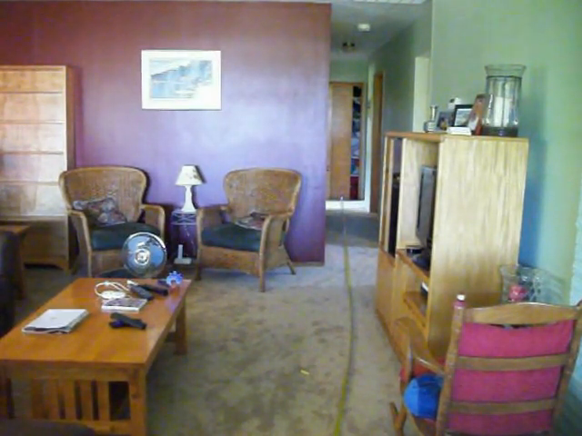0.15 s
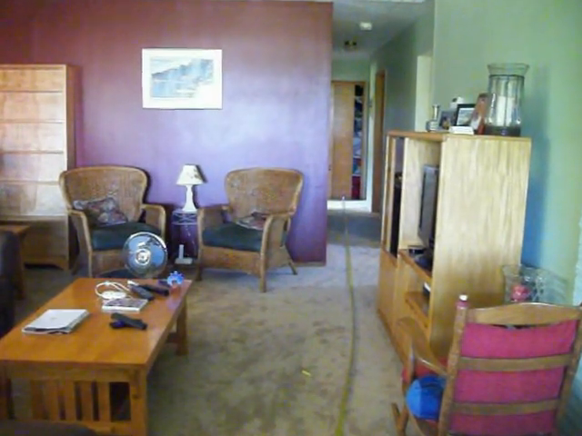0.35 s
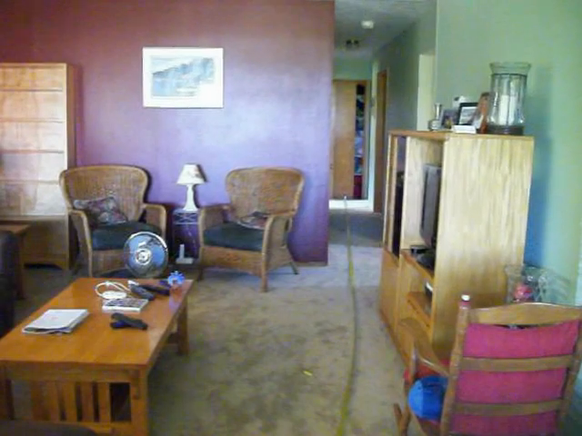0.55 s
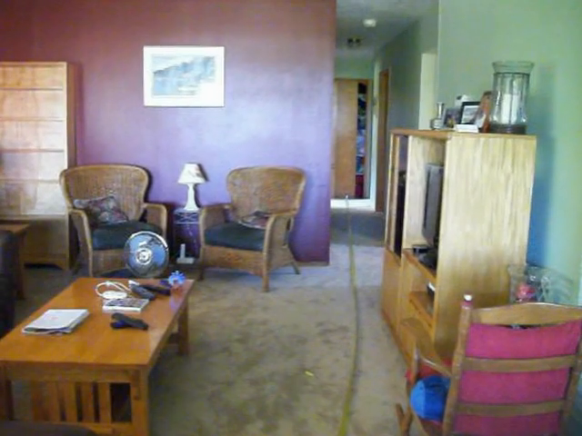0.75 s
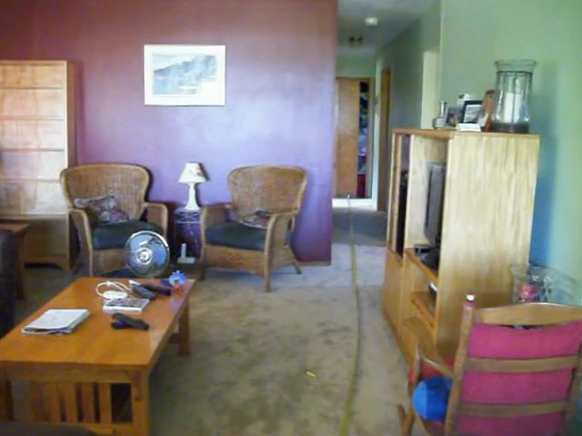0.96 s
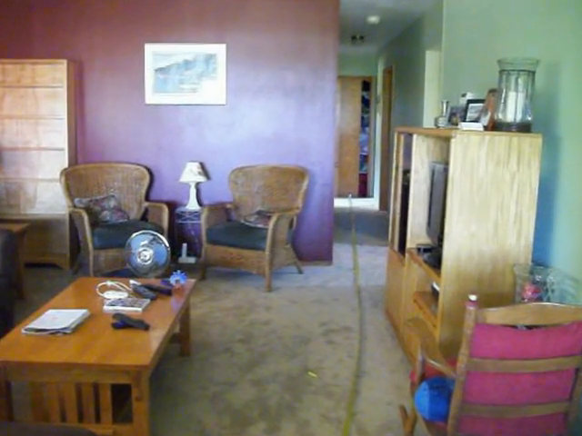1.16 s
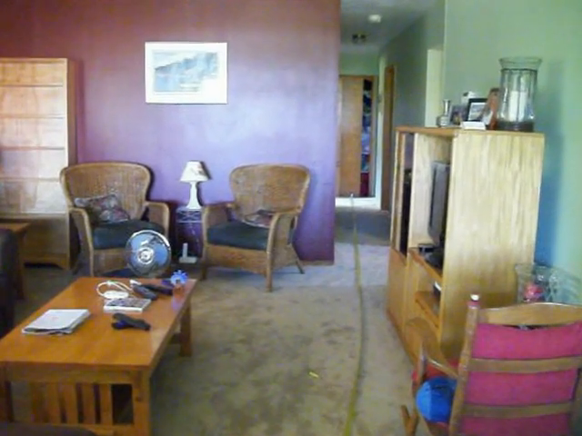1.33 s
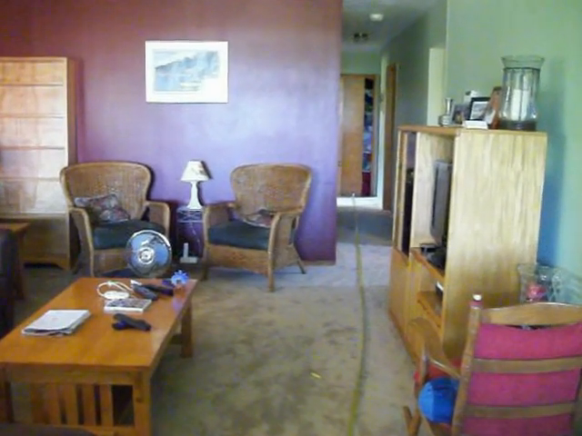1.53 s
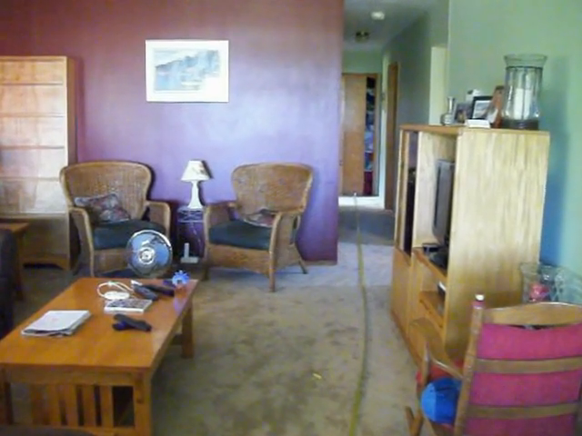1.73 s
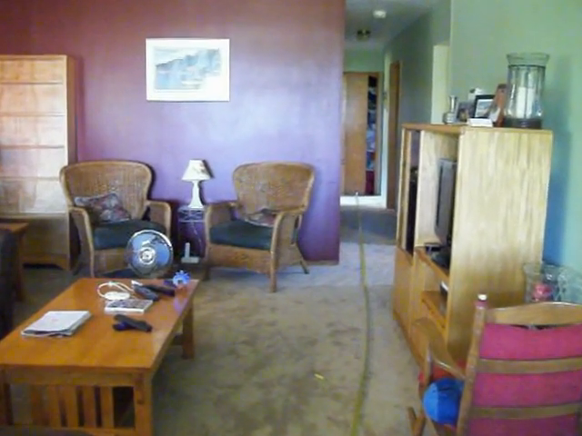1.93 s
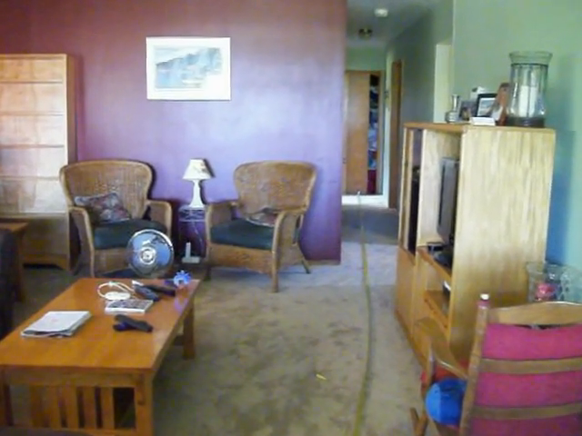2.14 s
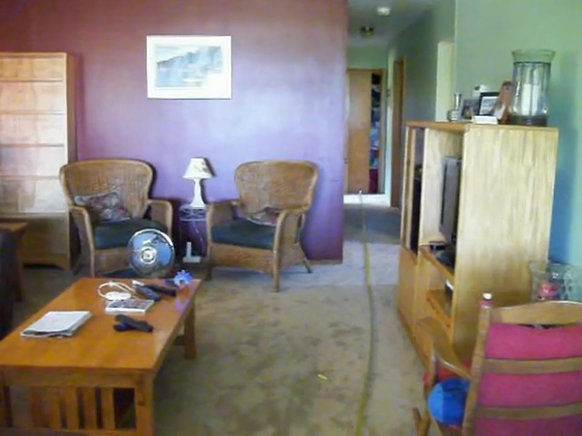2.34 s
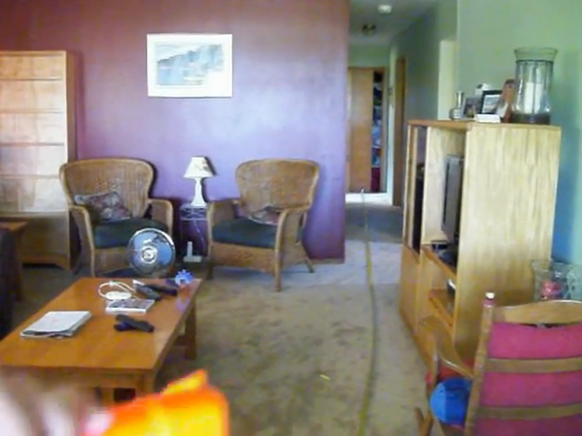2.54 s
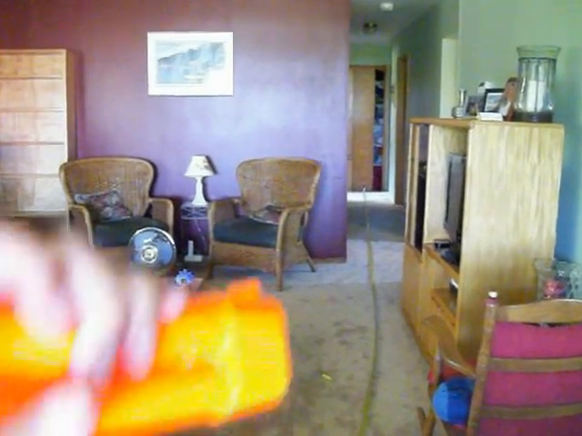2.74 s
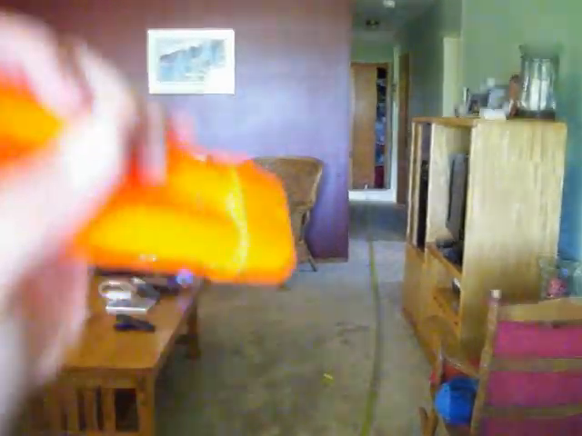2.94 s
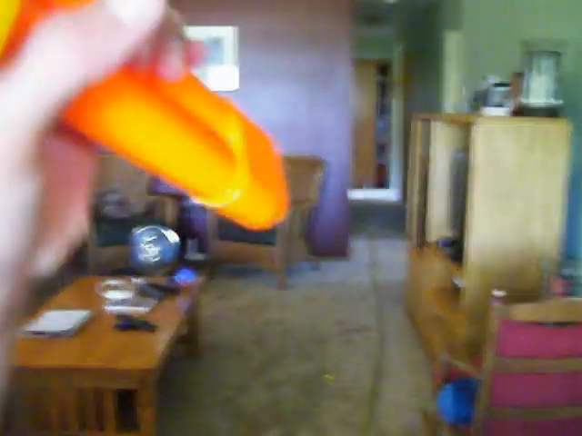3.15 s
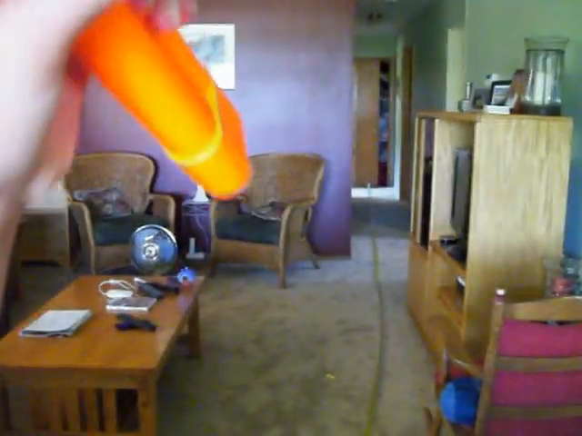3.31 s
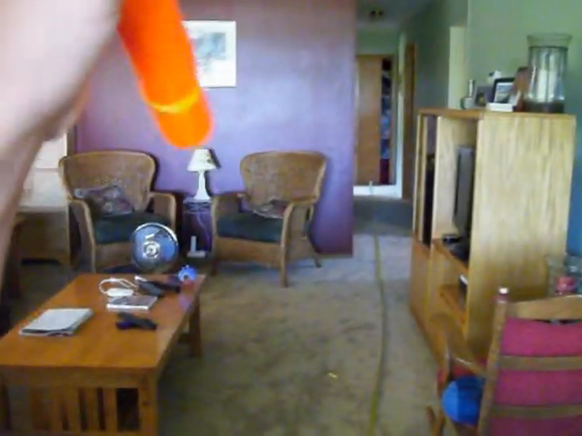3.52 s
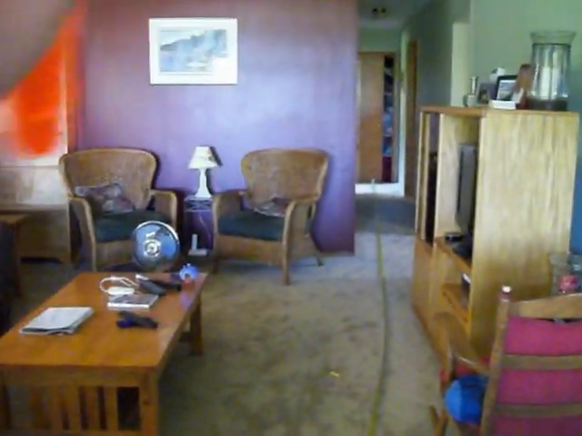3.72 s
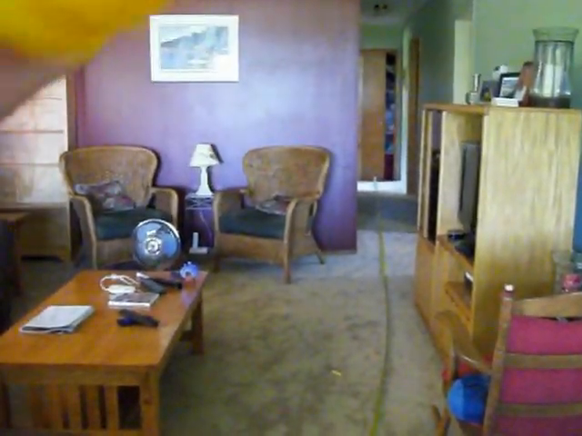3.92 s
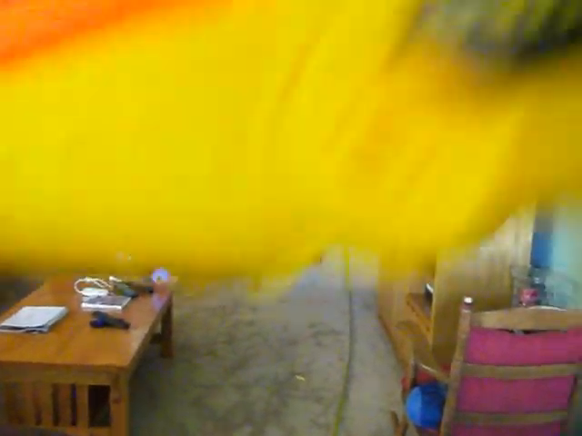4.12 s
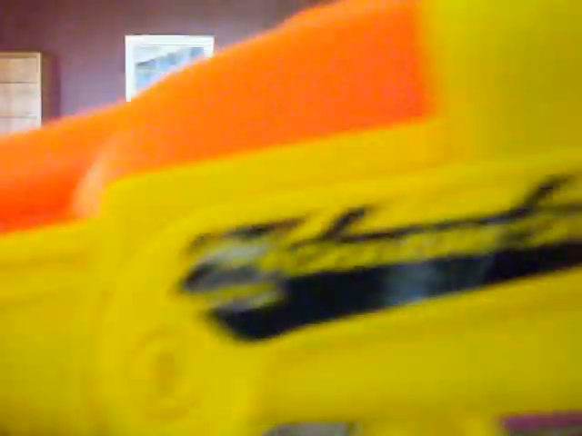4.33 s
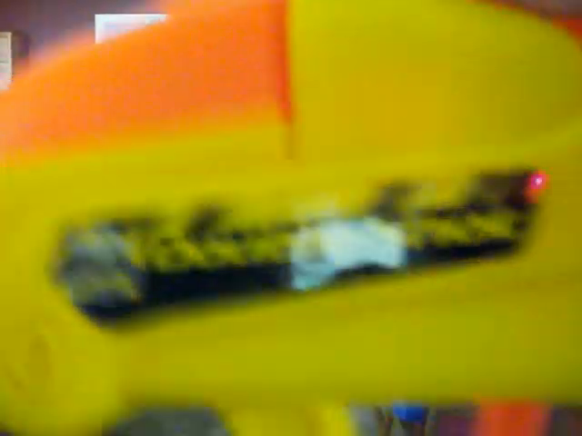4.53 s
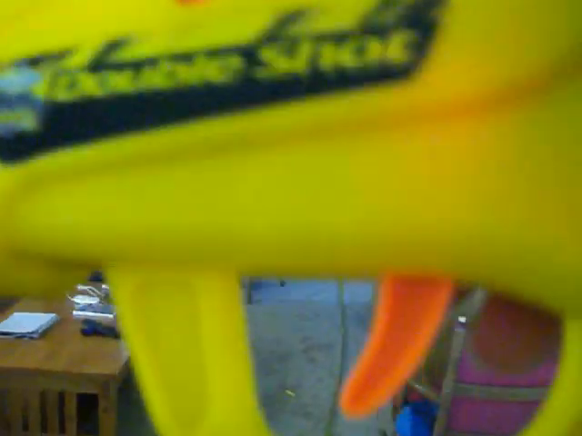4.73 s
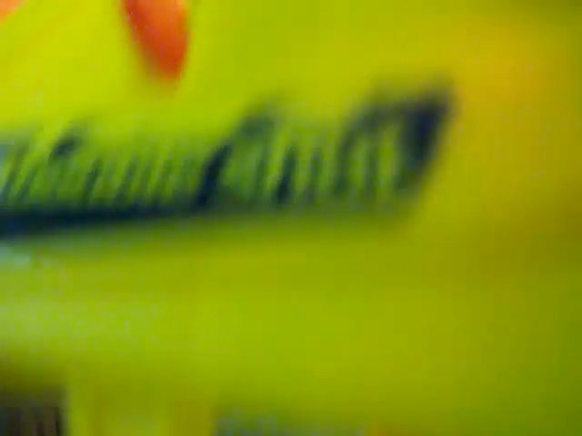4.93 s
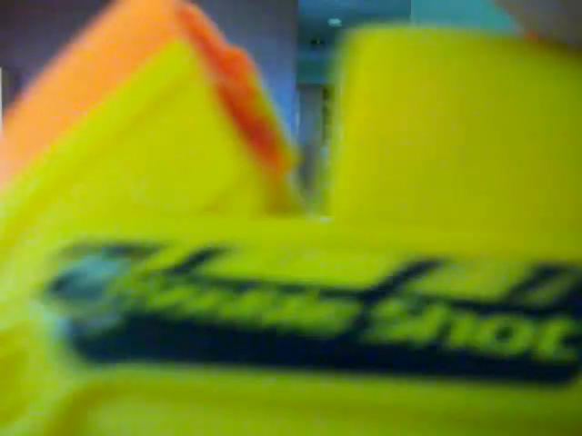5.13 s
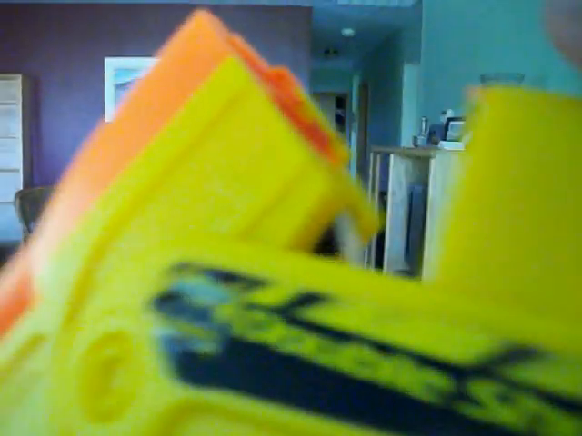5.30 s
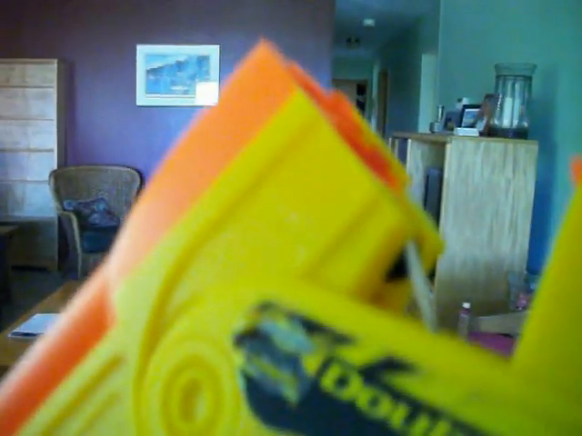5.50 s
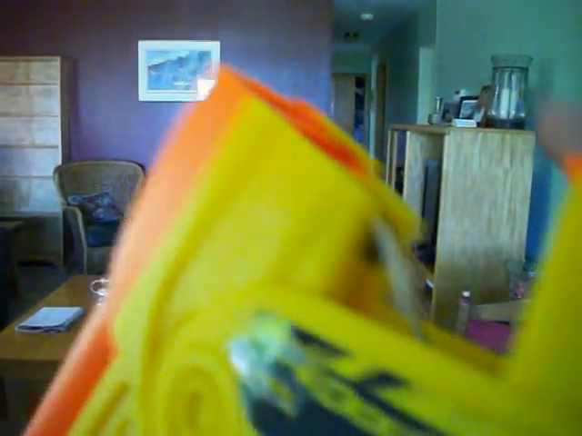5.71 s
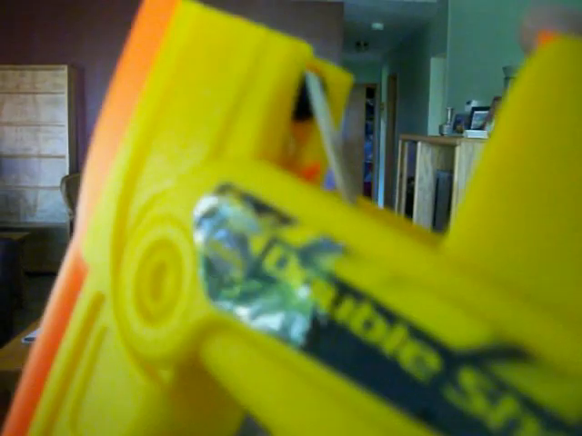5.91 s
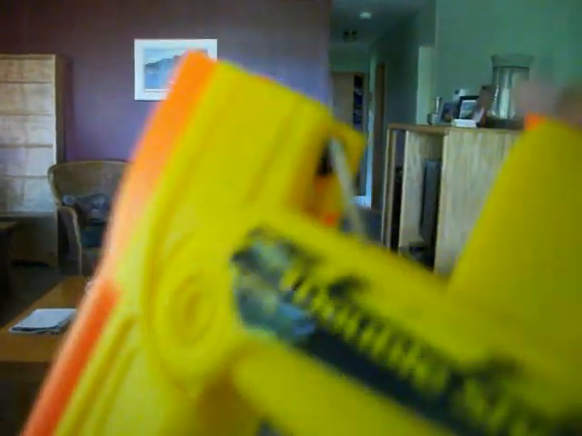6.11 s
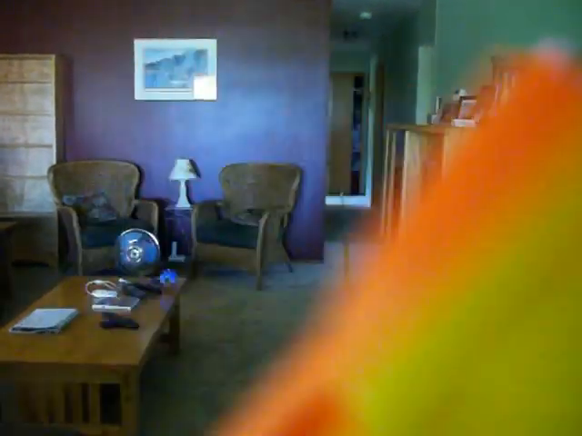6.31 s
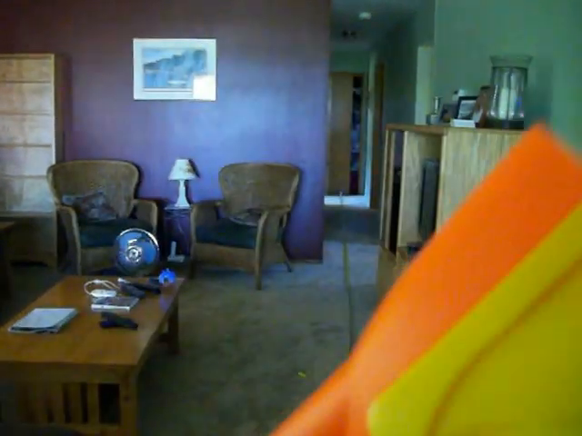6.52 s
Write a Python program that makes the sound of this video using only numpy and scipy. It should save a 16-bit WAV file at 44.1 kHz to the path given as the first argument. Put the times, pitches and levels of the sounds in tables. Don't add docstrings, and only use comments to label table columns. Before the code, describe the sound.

A hollow plastic toy blaster is fumbled, drops a part clattering on a tabletop, then is worked with increasingly loud clacks, grinding and squeaks.

```python
import sys
import numpy as np
from scipy import signal
from scipy.fft import rfft, irfft
from scipy.io import wavfile

SR = 44100
rng = np.random.default_rng(int(sys.argv[2]) if len(sys.argv) > 2 else 0)


def put_to_file(sound):
    columns = np.atleast_2d(sound).T
    safe = np.clip(columns, -1, 1)
    whole_steps = np.round(safe * 32767)
    wavfile.write(sys.argv[1], SR, whole_steps.astype(np.int16))


def undo_db(level):
    steps = np.asarray(level, float) / 20
    return 10 ** steps


N = 289296


def rms_one(x):
    return x / np.sqrt(np.mean(x ** 2) + 1e-20)


def drift(rate_hz):
    r = np.exp(-2 * np.pi * rate_hz / SR)
    noise = rng.standard_normal(N + SR)
    return rms_one(signal.lfilter([1], [1, -2 * r, r * r], noise)[SR:])


def resonate(x, hz, width_hz):
    r = np.exp(-np.pi * width_hz / SR)
    zeros = [(1 - r * r) / 2, 0, (r * r - 1) / 2]
    poles = [1, -2 * r * np.cos(2 * np.pi * hz / SR), r * r]
    return signal.lfilter(zeros, poles, x)


def body(x, modes):
    return sum((-1) ** k * undo_db(db) * resonate(x, hz, w) for k, (hz, w, db) in enumerate(modes))


def coloured(x, spectrum):
    hz, db = np.transpose(spectrum)
    f = np.fft.rfftfreq(N, 1 / SR) + 1
    gain = undo_db(np.interp(np.log(f), np.log(hz), db))
    return rms_one(irfft(rfft(x) * gain, N))


def grains(per_s, spread_db):
    sizes = undo_db(spread_db * np.minimum(rng.exponential(1, N), 4)) * rng.choice([-1, 1], N)
    return sizes * (rng.random(N) < per_s / SR) + 1e-18


def stretches(tables):
    t, rows = np.arange(N) / SR, np.concatenate(tables)
    edges = [(p[0][0] - .002, p[0][0], p[-1][0], p[-1][0] + .003) for p in tables]
    gate = sum(np.interp(t, e, [0, 1, 1, 0]) for e in edges)
    return [gate] + [np.interp(t, rows[:, 0], c) for c in rows.T[1:]]


def add(out, s, sound):
    i = round(s * SR)
    out[i:i + len(sound)] += sound[:N - i]


def contact(ring_hz, ring_db, crack_db, crack_hz, noise, ring_s, chatter_s, broad):
    t = np.arange(len(noise)) / SR
    touch = noise + 2.5 * np.sign(noise[0]) * (t < .00008)
    chatter = touch * np.exp(-t / chatter_s)
    panel = resonate(resonate(chatter, crack_hz, 1200), crack_hz, 1200)
    crack = panel + broad * resonate(resonate(chatter, 4300, 8200), 4300, 8200)
    ring = resonate(resonate(touch * np.exp(-t / ring_s), ring_hz, 880), ring_hz, 880)
    return undo_db(ring_db) * ring / np.abs(ring).max() + undo_db(crack_db) * crack / np.abs(crack).max()


def contacts(rows, ringing, scatter_db):
    out = np.zeros(N)
    shell_hz, ring_gain_db, crack_gain_db, chatter_s, ring_s, broad = ringing
    for s, crack_db, ring_db, crack_hz in rows:
        noise = rng.standard_normal(900)
        ring_hz = shell_hz * undo_db(scatter_db * noise[-1])
        add(out, s, contact(ring_hz, ring_db + ring_gain_db, crack_db + crack_gain_db, crack_hz, noise,
                            ring_s, chatter_s, broad))
    return out


# start in seconds, crack peak in dB, hollow ring in dB, crack in Hz.
FUMBLES = [(0.1595, -39, -44, 2560), (0.4557, -32.5, -37, 2200), (0.484, -24.5, -38, 4430),
           (0.7851, -30.5, -43, 4600), (1.2132, -36, -44, 2100), (1.2414, -35.5, -43, 2660),
           (1.3864, -26, -33, 2350), (1.3924, -13.5, -31, 2680), (1.4507, -23, -34, 1980),
           (1.4843, -15.5, -27.5, 4420), (1.494, -14.5, -27.5, 2620), (1.943, -35, -51, 2600),
           (2.2181, -17, -27.5, 3950), (2.3349, -20, -31.5, 3060), (2.4402, -27, -30.5, 1750),
           (2.6674, -21, -32.5, 3150), (2.697, -30, -39.5, 4440), (2.818, -37, -49, 1940),
           (2.861, -31, -59, 2370), (2.771, -42, -60, 4470), (2.9655, -50, -59, 4030),
           (3.7582, -42, -42, 1930), (3.7733, -27, -31.5, 3240), (3.783, -31, -55, 1810)]
DROP = [(2.9876, -26, -50, 3900), (2.9915, -16, -31, 2950), (2.9964, -12, -24, 1910),
        (2.9997, -11, -23, 2840), (3.0099, -13, -11, 1980), (3.0158, -12, -30, 2320),
        (3.0246, -14, -28.5, 2500), (3.031, -13, -37, 2800), (3.0377, -17.5, -32, 2300),
        (3.0417, -15, -26, 2240), (3.051, -19, -24, 2650), (3.062, -15, -33, 2300),
        (3.099, -6.5, -33, 2180), (3.1051, -17, -26, 2670), (3.1131, -13, -27, 4800),
        (3.126, -18, -41, 2710), (3.131, -14, -29, 5120), (3.1438, -21, -40, 4640),
        (3.1526, -30, -42, 1970), (3.19, -14, -14, 2200), (3.195, -20.5, -27, 5000),
        (3.2072, -20, -27, 1950), (3.2145, -38, -39, 2350), (3.2234, -26, -31, 2200),
        (3.233, -25, -36, 1750), (3.252, -31, -43, 1880), (3.261, -30, -45, 1710), (3.3198, -31, -33, 1990),
        (3.3224, -21, -26, 1900), (3.327, -28, -34.5, 2110)]
PICK_UP = [(3.9988, -25, -26, 3080), (4.006, -11, -27, 3360), (4.0103, -3, -21, 1700),
           (4.022, -9, -28.5, 1700), (4.0271, -11.5, -29, 1720), (4.2345, -36, -63, 4010),
           (4.2927, -26, -31.5, 2940), (4.3005, -32, -52, 1980), (4.336, -14, -21.5, 2800),
           (4.3472, -47, -34, 2780), (4.353, -36, -38, 4370), (4.3648, -42, -36, 4220),
           (4.387, -26, -24, 1700), (4.3945, -18, -25, 3280), (4.4, -23, -41, 2370),
           (4.4047, -21, -33, 2350), (4.4149, -25, -27, 2410), (4.4236, -26, -35, 2690),
           (4.432, -23, -29, 2410), (4.438, -30, -38.5, 2930), (4.445, -25, -45, 2530),
           (4.4566, -30, -45, 2370), (4.5151, -27.5, -21.5, 2610), (4.5387, -21.5, -24, 1700)]
LATCH = [(4.592, -1.5, -14.5, 1720), (4.603, -4.5, -18, 3490), (4.6196, -19, -21.5, 2390),
         (4.6353, -7.5, -27, 2610), (4.6474, -18, -32.5, 3360), (4.6524, -13, -19, 2930),
         (4.6607, -8.5, -21.5, 3920), (4.6661, -10, -15.5, 1860), (4.6864, -15.5, -24, 2240),
         (4.698, -24, -15.5, 1870), (4.7665, -21, -19, 1870), (4.7845, -10, -20.5, 4670),
         (4.8002, -6, -14, 2450), (4.833, -29, -32, 1700), (4.859, -13, -24.5, 2130),
         (4.8622, -21.5, -23.5, 2130), (4.883, -15, -18, 2600), (4.8907, -8.5, -24, 4460),
         (4.8959, -13, -20, 2510), (4.9028, -26, -23.5, 2610), (4.9185, -25, -22, 1690),
         (4.9228, -18.5, -22, 4030), (4.932, -14, -30.5, 3320), (4.9465, -3, -19.5, 4020),
         (4.95, -16, -17.5, 2730), (4.968, -22, -28, 2110), (4.9785, -16.5, -26.5, 2480),
         (4.9828, -23, -24.5, 4650), (4.9916, -13, -24, 2480), (5.02, -17, -25.5, 2710),
         (5.0444, -30, -36, 2490), (5.0538, -6, -28.5, 2600), (5.0616, -1, -20.5, 2530),
         (5.0716, -12, -21.5, 3570), (5.085, -27, -36, 4350), (5.114, -33, -37, 2200),
         (5.134, -10, -23, 3300), (5.147, -6.5, -12.5, 4150), (5.1546, -12.5, -25.5, 4300),
         (5.1562, -26, -19.5, 4350), (5.1951, -13, -23.5, 2000), (5.207, -22, -25.5, 1790),
         (5.2282, -21, -26, 1940), (5.251, -16.5, -29.5, 3470), (5.267, -17.5, -21, 2430),
         (5.2814, -9.5, -21.5, 3700)]
HINGE = [(5.3127, -10, -25, 3920), (5.3225, -18, -15, 1700), (5.3378, -7, -19, 1700),
         (5.3695, -17, -18, 1700), (5.3796, -0.5, -8.5, 4570), (5.403, -6.5, -16, 1870),
         (5.42, -13.5, -13.5, 3810), (5.434, -13, -24, 4490), (5.4518, -9.5, -21, 4310),
         (5.4686, -2, -3, 2030), (5.4823, -10, -12, 2630), (5.4923, 2, -5, 2830), (5.4956, -3.5, -8, 3320),
         (5.5023, -19, -26, 3900), (5.508, -13.5, -28.5, 5080), (5.513, -16.5, -22, 2110),
         (5.5558, -8, -12, 2410), (5.5625, 1, -12, 4100), (5.5724, -6.5, -27, 2070),
         (5.5798, -11.5, -18, 4030), (5.5853, -5, -20.5, 1700), (5.5964, -2.5, -13, 1880),
         (5.6271, -18.5, -32, 1780), (5.6802, 1, -6.5, 2050), (5.685, 0, -8, 3760),
         (5.7136, -12, -23, 4200), (5.726, -22, -24, 3060), (5.754, -10, -12.5, 4800),
         (5.757, -8.5, -11, 5000), (5.8085, -32, -16, 1980), (5.8157, -5, -16, 1820),
         (5.8309, 6, -6.5, 4520), (5.868, -8, -21, 4130), (5.8775, 2.5, -13, 2910), (5.888, -4, -15, 2740),
         (5.8976, -13, -17, 3940), (5.9064, -9, -7, 1730), (5.9113, -11, -10.5, 1780),
         (5.9237, -6.5, -17, 3810), (5.9598, -7.5, -17, 4600), (5.9665, -2.5, -9.5, 1690)]
SPRING = [(6.028, 4.5, -5, 2040), (6.0354, 1, -11, 1920), (6.047, -2, -15, 2000), (6.055, -14, -21, 1740),
          (6.0755, 3.5, -13.5, 3800), (6.0908, -15, -25, 3320), (6.0985, 2, -10, 3830),
          (6.1157, -15, -14, 2580), (6.1243, -5, -18, 1940), (6.1286, -10, -17, 1700),
          (6.134, -16, -29, 2050), (6.153, 1.5, -18, 2340), (6.165, -16, -30, 1810),
          (6.175, -15, -21, 1700), (6.185, -17, -36, 2300), (6.19, 0, -17, 1700), (6.1965, -7, -13, 3920),
          (6.2018, 1, -12, 3900), (6.2085, -17, -22, 3930), (6.2142, -9, -20, 1810),
          (6.2447, -18, -16.5, 3620), (6.2601, -12, -12, 2910), (6.267, -14, -8, 3980),
          (6.274, -7.5, -15, 3040), (6.2863, -14, -18, 2090), (6.3035, -1.5, -23, 3570),
          (6.3116, -9, -16, 2130), (6.3176, -11, -17, 1700), (6.324, -9, -21, 1920),
          (6.3347, -8, -18, 4150), (6.34, -1, -13.5, 1830), (6.3505, 0, -20, 4700), (6.3592, -1, -11, 2250),
          (6.3744, -17, -12.5, 2170), (6.382, -16, -21.5, 3470), (6.3846, -15, -17, 2050),
          (6.3947, -18, -11.5, 2200), (6.4053, 1.5, -15, 3730), (6.4165, -6, -11, 3470),
          (6.425, -10, -14, 1700), (6.4903, -2.5, -13.5, 3550), (6.497, -5.5, -26, 3550),
          (6.5016, -11, -16.5, 2070), (6.513, -8.5, -19, 2130), (6.5267, -16, -29, 2090),
          (6.5293, -7.5, -8.5, 2110), (6.5391, -5, -22, 2080), (6.5493, -8, -19, 2730)]
# ring in Hz, ring gain in dB, crack gain in dB, chatter in seconds,
# ring in seconds, broad share (ratio).
ACTION_RINGING = [
    (940, 4, 1, 0.0043, 0.011, 0.56),
    (1380, 13, 2, 0.0021, 0.0037, 0.35),
    (1050, 0.5, -2, 0.0031, 0.0086, 0.23),
    (940, 7.5, 3, 0.0029, 0.0069, 0.54),
    (1100, 4, 2, 0.0026, 0.0054, 0.54),
    (1090, 5.5, 2.5, 0.0021, 0.0048, 0.6),
]


def clicks():
    actions = [FUMBLES, DROP, PICK_UP, LATCH, HINGE, SPRING]
    scatters_db = [1.43, .1, 1.43, 1.43, 1.43, 1.43]
    return sum(contacts(*action) for action in zip(actions, ACTION_RINGING, scatters_db))


# start in seconds, crack peak in dB, hollow ring in dB, crack in Hz.
SNAPS = [
    (3.0136, 2, -9.5, 2400),
    (3.0457, -12, 2.5, 2620),
    (3.0494, 3, -4, 2370),
    (3.0955, -17, 3.5, 2380),
    (3.187, 1, -4.5, 2254),
    (5.492, -0.5, -5.5, 2830),
    (5.5624, -4.5, -26, 3750),
    (5.829, -1, -13.5, 4250),
    (3.0972, -13.5, 4.5, 2380),
    (5.8313, -3, -12, 3300),
]
# ring in Hz, ring gain in dB, crack gain in dB, chatter in seconds,
# ring in seconds, broad share (ratio).
CASING_RINGING = (1370, 0, 0, .0007, .0011, .14)


def snaps():
    return contacts(SNAPS, CASING_RINGING, .1)


# start in seconds, length in seconds, bright level in dB, hollow level in dB, swell in dB.
RUSTLES = [
    (0.32, 0.13, -48, -60, 8),
    (0.496, 0.024, -44, -56, -5),
    (1.53, 0.34, -52, -69, -5),
    (4.351, 0.032, -52, -43, -3),
    (.078, .006, -47, -70, -3),
    (5.305, .006, -29, -44, 0),
    (5.672, 0.0068, -22, -44, 0),
]
SLIDES = [
    (4.389, 0.031, -28.5, -34, -4),
    (4.422, 0.05, -39.5, -42.5, -9.5),
    (3.19, 0.14, -47, -51, -19),
]
FINGER_STROKES = [
    (1.384, 0.032, -33, -35, -3),
    (1.416, 0.078, -34, -37, 8.5),
    (1.478, 0.097, -41, -47, -11),
    (1.929, 0.026, -45.5, -47, 4),
    (2.846, 0.026, -41, -65, 2),
    (3.125, 0.027, -29.5, -47, -10),
    (3.765, 0.04, -50.5, -58, 17),
    (4.005, 0.048, -33, -35.5, -21),
]
# start in seconds, length in seconds, bright level in dB,
# hollow level in dB.
GRINDS = [(4.589, 0.025, -20.5, -23.5), (4.642, 0.036, -23, -27), (4.884, 0.024, -24, -24),
          (4.974, 0.019, -28, -27), (5.049, 0.03, -17.5, -24), (5.143, 0.031, -30.5, -26),
          (5.374, 0.016, -19.5, -19), (5.395, 0.042, -23, -21), (5.461, 0.05, -19, -19.5),
          (5.495, 0.075, -22.5, -26), (5.553, 0.05, -17, -19), (5.682, 0.097, -27.5, -26),
          (5.824, 0.046, -21.5, -28.5), (5.873, 0.056, -21.5, -21.5), (5.956, 0.022, -20.5, -24),
          (6.027, 0.049, -27.5, -20.5), (6.072, 0.07, -21, -27), (6.186, 0.053, -19, -22),
          (6.254, 0.028, -18.5, -22), (6.307, 0.025, -26, -25.5), (6.33, 0.065, -20.5, -25),
          (6.396, 0.041, -21.5, -20.5), (6.481, 0.09, -26, -23.5)]
# frequency in Hz, level in dB per Hz.
SLIP_SPECTRUM = [(880, -15), (1500, 0), (2430, -3.5), (3760, -9), (4750, -9), (5610, -14), (6550, -8),
                 (8520, -32), (14400, -120)]
# frequency in Hz, width in Hz, level in dB.
SHELL = [(950, 264, 3), (1230, 394, -5)]


def scrapes():
    out = np.zeros(N)
    slips = coloured(grains(3500, 2.8) * undo_db(3.2 * drift(150)), SLIP_SPECTRUM)
    hollow = rms_one(body(grains(3000, 1.8) * undo_db(2 * drift(90)), SHELL))
    grind_swell_db = -6
    grinds = [(*row, grind_swell_db) for row in GRINDS]
    kinds = [(RUSTLES, 4600, 4100, .21), (SLIDES, 2660, 2400, .03), (list(FINGER_STROKES) + grinds, 3380, 4500, 1)]
    for rows, hz, width_hz, broad in kinds:
        rung = resonate(resonate(slips, hz, width_hz), hz, width_hz) + broad * slips
        for start, length, bright_db, hollow_db, change_db in rows:
            span = slice(round(start * SR), round((start + length) * SR))
            panel = rms_one(rung[span])
            swell_db = np.linspace(-1, 1, len(panel)) * change_db
            stroke = undo_db(swell_db + bright_db) * panel + undo_db(0.3 * swell_db + hollow_db) * hollow[span]
            out[span] += stroke * signal.windows.tukey(len(panel), .3)
    return out


# start in seconds, length in seconds, first slip rate in Hz,
# last slip rate in Hz, overtones in dB.
SQUEAKS = [
    (5.692, .018, 960, 1030, -15),
    (5.765, .023, 885, 915, 0),
    (5.7881, .009, 915, 1020, -3),
    (5.7972, .007, 1020, 1090, -14),
    (6.223, .011, 900, 1110, -14),
]
# multiple of the slip rate, level in dB.
SQUEAK_ORDERS = [(1, 1), (2, -7), (3, -7.5), (4, -10.5), (5, -25), (6, -35)]


def squeaks():
    gate, hz, overtone_db = stretches([[(s, a, db), (s + length, b, db)] for s, length, a, b, db in SQUEAKS])
    phase = 2 * np.pi * np.cumsum(hz * (1 + .007 * drift(300))) / SR
    stack = np.zeros(N)
    for k, db in SQUEAK_ORDERS:
        order_db = db + (overtone_db + 2.5 * drift(30)) * (k > 1)
        stack += undo_db(order_db) * np.sin(k * phase)
    return np.minimum(gate, 1) * undo_db(-11 + drift(120)) * stack


def soft_knocks(rows, cycles, gain_db, softness):
    out, t = np.zeros(N), np.arange(3000) / SR
    for s, peak_db, hz in rows:
        envelope = (t * hz) ** softness * np.exp(-t * hz / cycles * 2)
        add(out, s, undo_db(peak_db + gain_db) * np.sin(2 * np.pi * hz * t) * envelope)
    return out


# start in seconds, peak in dB, pitch in Hz.
TWANGS = [(1.9305, -31.5, 870), (1.9355, -29, 695), (3.0228, -4, 1445), (4.6535, -11.5, 850),
          (4.687, -13.5, 1000), (5.3815, -14.5, 1100), (5.713, -4, 1000), (5.727, -11, 1050),
          (5.7415, -10.5, 1000), (5.7475, -10, 1050), (5.924, -15, 950), (6.1243, -8, 1050),
          (6.274, -10, 1050), (6.3035, -7, 1050), (6.312, -14, 1050), (6.351, -5.5, 1250),
          (6.395, -7.5, 1150), (6.4055, -4.5, 1050), (6.5155, -9, 1080), (6.525, -9, 1000),
          (6.5395, -5, 1020), (6.549, -5.5, 1020)]


def twangs():
    return soft_knocks(TWANGS, cycles=4.55, gain_db=3.3, softness=0.44)


# time in seconds, rub level in dB.
PRESSURE = [(1.2, -90), (1.43, -47), (1.62, -51.5), (1.9, -62), (2.2, -53.5), (2.9, -57.5), (3.05, -60),
            (3.16, -35.5), (3.4, -74), (4.05, -54.5), (4.38, -63.5), (4.67, -43), (4.96, -38.5),
            (5.69, -32), (6.0, -35.5), (6.1, -26), (6.25, -31.5), (6.56, -35)]


def rubbing():
    gate, bright_db = stretches([PRESSURE])
    hollow_db = -61.5 + 1.193 * (bright_db + 58.5)
    surface = coloured(grains(9000, 1.2) * undo_db(1.5 * drift(40)), SLIP_SPECTRUM)
    hollow = rms_one(body(grains(2500, 1.8) * undo_db(3 * drift(40)), SHELL))
    return gate * (undo_db(bright_db) * surface + undo_db(hollow_db) * hollow)


# peak time in seconds, level in dB, fading in dB per second.
THUDS = [
    (2.992, -22, 84),
    (3.224, -32, 307),
    (3.13, -34, 77.5),
    (4.559, -37, 57.5),
    (6.41, -36.5, 194),
]
# frequency in Hz, width in Hz, level in dB.
GRIP = [(130, 49, 7.5), (348, 10, -12), (264, 210, 6)]


def thuds():
    t, rise_db_per_s = np.arange(N) / SR, 3999
    level = sum(undo_db(db - np.maximum(rise_db_per_s * (s - t), fading * (t - s))) for s, db, fading in THUDS)
    band = signal.butter(2, [60, 500], "band", fs=SR, output="sos")
    pushes = signal.sosfilt(band, grains(900, 2.9))
    return level * rms_one(body(pushes, GRIP))


# start in seconds, peak in dB, pitch in Hz.
GRIP_KNOCKS = [(4.534, -25.5, 313), (4.88, -25, 408), (4.972, -29.5, 129), (5.015, -32, 133),
               (5.052, -25, 250), (5.485, -24, 394), (5.707, -16.5, 378), (5.754, -22, 313),
               (5.884, -15.5, 409), (6.02, -32, 113), (2.992, -16.5, 93), (3.096, -10.5, 570),
               (3.081, -16, 150), (2.99, -24, 215), (4.601, -29.5, 135), (5.4, -24, 350),
               (5.491, -25.5, 193), (5.575, -24, 303), (5.872, -17, 510), (5.957, -35.5, 201)]


def grip_knocks():
    return soft_knocks(GRIP_KNOCKS, cycles=1.37, gain_db=12, softness=1)


# start in seconds, level in dB.
BOOMS = [
    (3.083, -16),
    (3.2, -13),
    (3.224, -16.5),
    (3.32, -24),
]
# frequency in Hz, width in Hz, level in dB.
TABLE_TOP = [(129, 13.7, 2.5), (313, 14.6, -6), (396, 27, -13.5)]


def booms():
    pushes = np.zeros(N) + 1e-18
    for s, level_db in BOOMS:
        add(pushes, s, undo_db(level_db + 23.5) * np.hanning(40))
    return body(pushes, TABLE_TOP)


# start in seconds, level in dB, length in seconds.
LOW_POPS = [
    (3.227, -16, 0.0046),
    (5.491, -27, 0.0045),
    (5.829, -15.5, 0.0026),
    (6.028, -33, 0.0066),
    (6.378, -18, 0.0076),
]


def low_pops():
    out = np.zeros(N)
    for s, level_db, length in LOW_POPS:
        add(out, s, undo_db(level_db) * np.hanning(round(length * SR)))
    return out


def room(x):
    t, t60_s, gap_s = np.arange(round(.5 * SR)) / SR, .32, .006
    tail = rng.standard_normal(len(t)) * undo_db(-60 * t / t60_s) * (t > gap_s)
    tail = resonate(tail, 3200, 6600)
    return signal.fftconvolve(x, tail / np.sqrt(np.sum(tail ** 2)))[:N]


# frequency in Hz, level in dB per Hz.
FAN = [(20, -1.5), (35, -12), (60, -5), (95, -17), (250, -12.5), (620, -20.5), (1230, -26), (3000, -32.5),
       (5300, -36)]
FAN_TOP = [(5800, -41), (6300, -54), (6900, -72), (9000, -110)]
# frequency in Hz, level in dB rms.
HUM = [(59.5, -57), (452.2, -62), (5340, -72), (5685, -73)]


def room_tone():
    t = np.arange(N) / SR
    lines = np.zeros(N)
    for hz, db in HUM:
        lines += undo_db(db + 2.5 + 0.76 * drift(7)) * np.sin(2 * np.pi * hz * t + 0.4 * drift(8.7))
    fan = coloured(rng.standard_normal(N), list(FAN) + list(FAN_TOP))
    return undo_db(-48 + 0.31 * drift(3.8)) * fan + lines


def scene():
    toy = clicks() + scrapes() + squeaks() + twangs() + rubbing()
    toy = toy + undo_db(-22) * room(toy)
    capsule_top = .76
    toy = capsule_top * np.tanh(toy / capsule_top) + snaps()
    toy = signal.sosfilt(signal.cheby2(10, 65, 7292, fs=SR, output="sos"), toy)
    return (toy + thuds() + grip_knocks() + booms() + low_pops() + room_tone())[None]


def low_pass(x):
    return signal.sosfilt(signal.butter(12, 15900, fs=SR, output="sos"), x)


def record(dry):
    overloaded = np.clip(dry + .0074, -1, 1)
    smooth = signal.sosfilt(signal.cheby2(12, 70, 16300, fs=SR, output="sos"), overloaded)
    return low_pass(smooth)


dry = scene()
out = record(dry)
put_to_file(out)
```